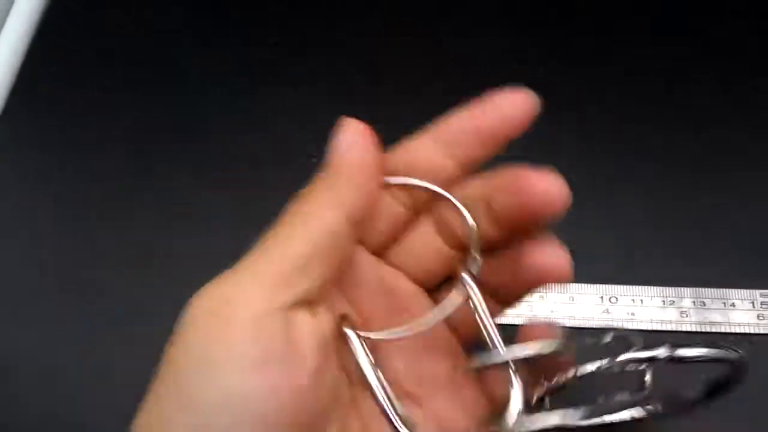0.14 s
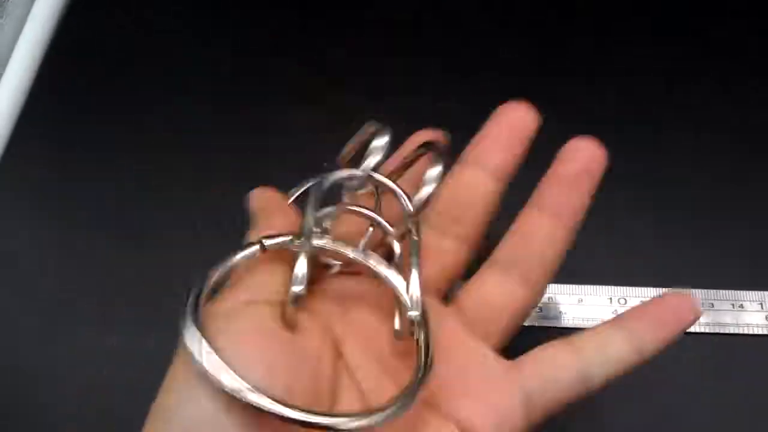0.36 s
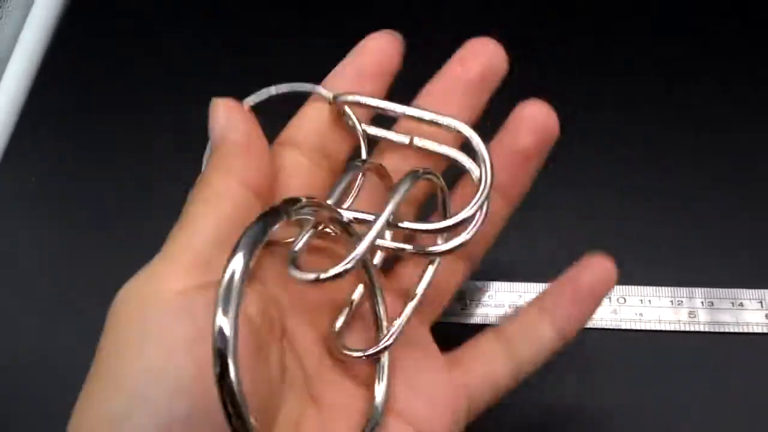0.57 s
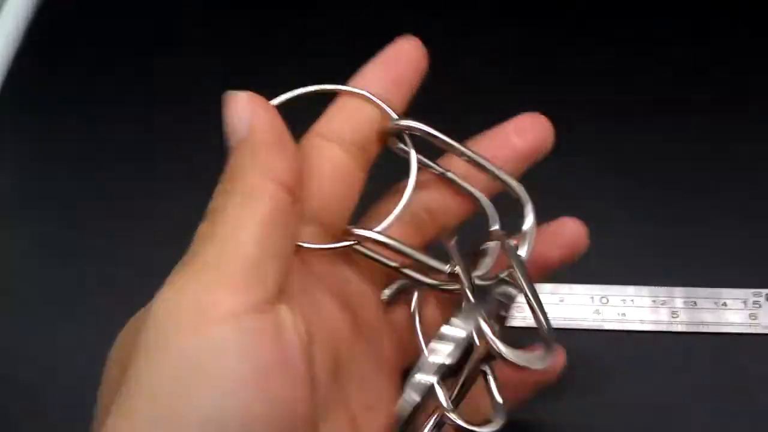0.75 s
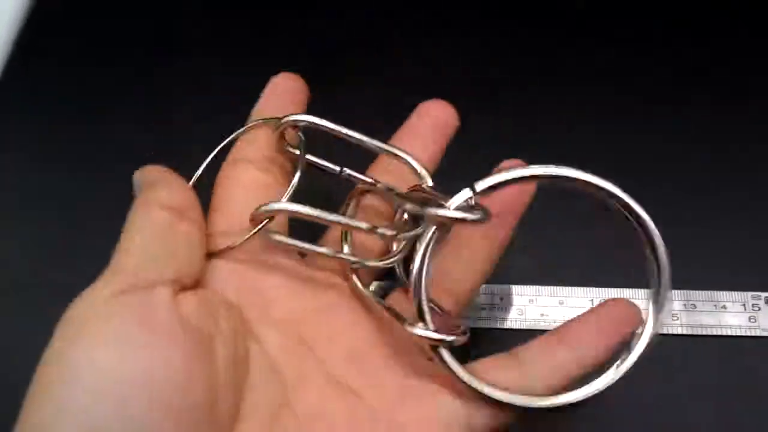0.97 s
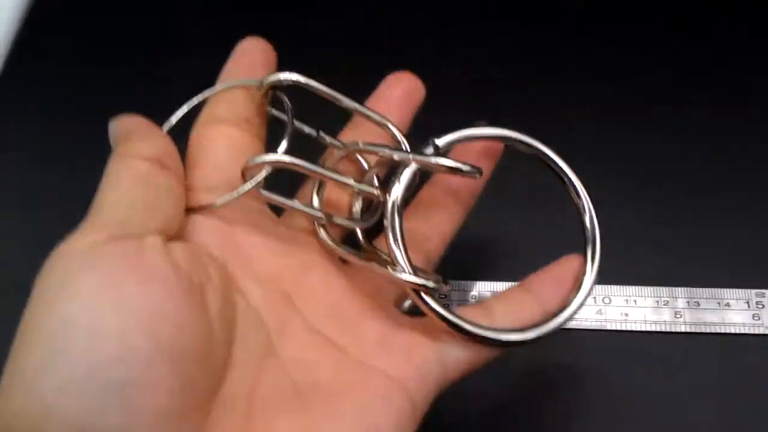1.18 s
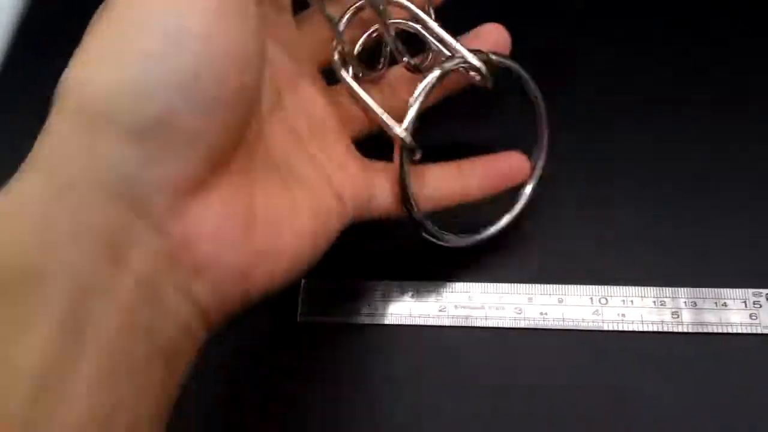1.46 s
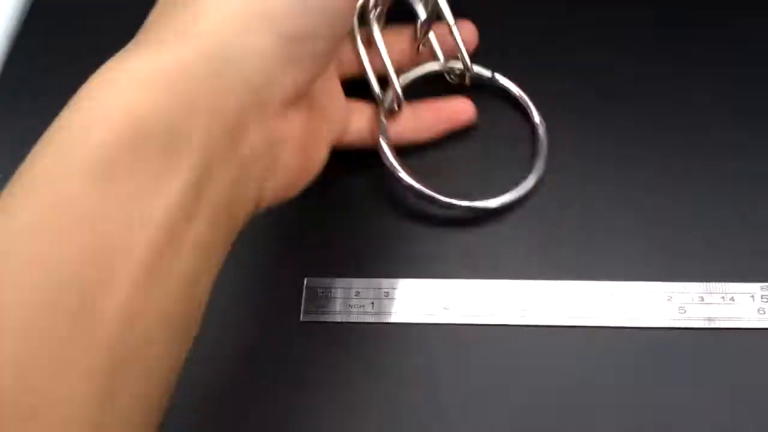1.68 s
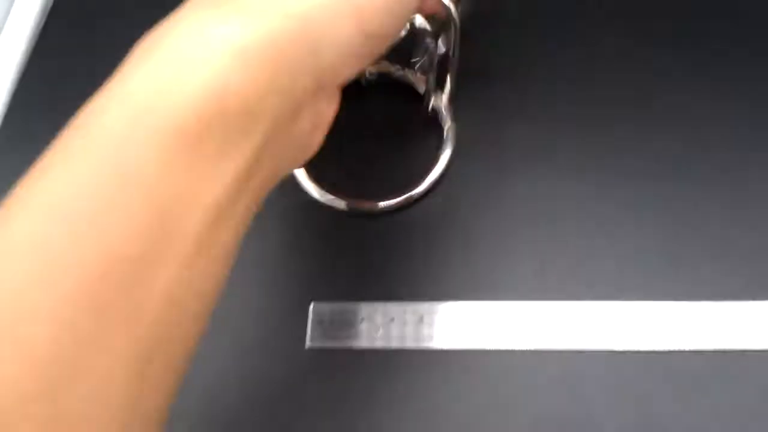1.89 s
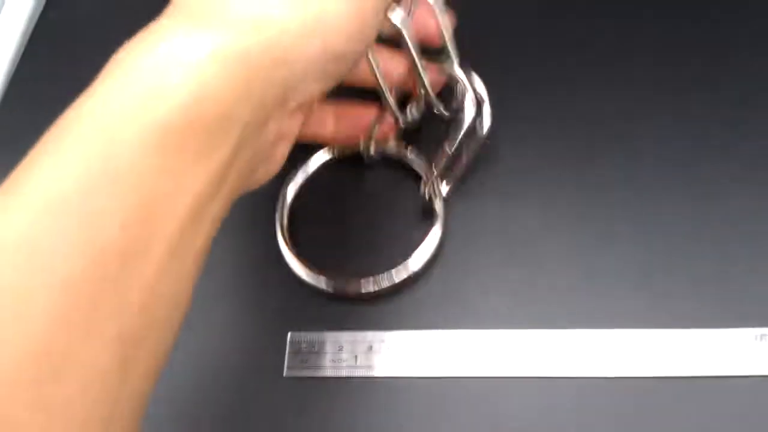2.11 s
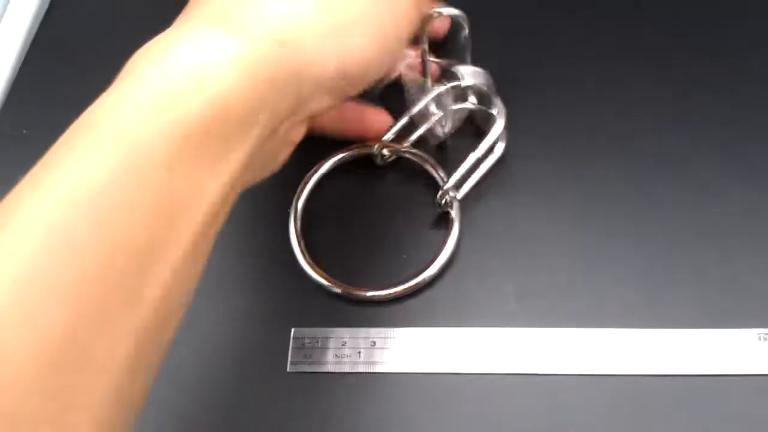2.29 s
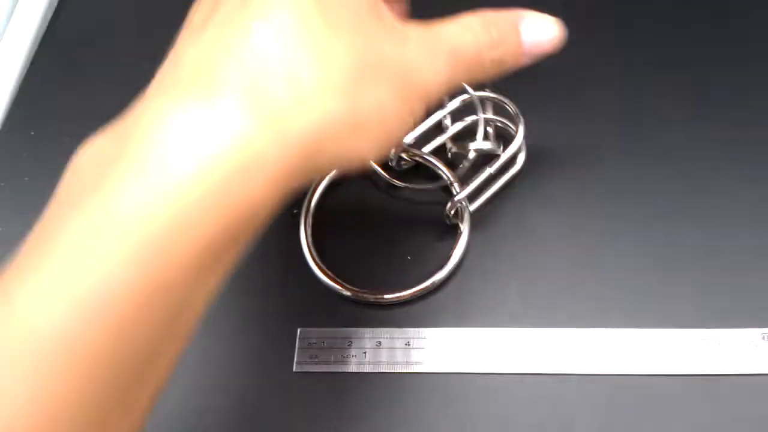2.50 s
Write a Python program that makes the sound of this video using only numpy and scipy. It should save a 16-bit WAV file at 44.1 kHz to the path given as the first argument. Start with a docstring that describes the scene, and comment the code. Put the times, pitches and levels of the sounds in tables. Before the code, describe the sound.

A steel ring puzzle clinks and jingles unevenly in a hand, with light scraping. After a brief lull it is lowered onto a table with two soft knocks and thin rattling. Close microphone, small room, faint fan hum.

```python
"""Jingling steel ring puzzle

A steel ring puzzle is jostled in a hand, then lowered onto a table, close to a stereo microphone.
Each contact chatters briefly and rings the large ring, the small ring and the wire links. The table
answers with a thin rattle and two knocks. A fan hums in the small room; the loudest jingle overloads."""
import sys
import numpy as np
from scipy import signal
from scipy.fft import rfft, irfft
from scipy.io import wavfile

SR = 44100
rng = np.random.default_rng(int(sys.argv[2]) if len(sys.argv) > 2 else 0)


def file_out(sig):
    """Save sig as 16-bit WAV at sys.argv[1]."""
    # one column per channel
    cols = np.atleast_2d(sig).T
    # limit, then scale
    lim = np.clip(cols, -1, 1)
    pcm = np.round(lim * 32767).astype(np.int16)
    wavfile.write(sys.argv[1], SR, pcm)


N = 116865
T = np.arange(N) / SR
TOUCH_S, LAID_S = 1.54, 2.2  # the puzzle first touches the table; the links lie on it
RISE_S, TOP_HZ = .004, 14150
SCATTER_DB, SPREAD_RAD = 1.5, .94  # chance variation in a tone's level and left-right phase
SIDES = np.array([[1], [-1]])  # plus on the left, minus on the right


def amp(db):
    """Turn decibels into a gain."""
    return 10 ** (np.asarray(db) / 20)


def unit(x):
    """Scale to an average power of 1."""
    return x / np.sqrt(np.mean(np.abs(x) ** 2))


def fade(age, t60):
    """Die away by 60 dB every t60 seconds."""
    return np.exp(-np.log(1000) * age / t60)


def envelope(start, hold, rise, fall):
    """Rise quickly, hold, then die away (all in seconds)."""
    age = np.maximum(T - start, 0)
    return (1 - np.exp(-age / rise)) * np.exp(-np.maximum(age - hold, 0) / fall)


def colour(x, curve):
    """Shape bass and treble along a (Hz, dB) curve; white noise keeps its power."""
    hz, db = np.array(curve, float).T
    f = np.maximum(np.fft.rfftfreq(N, 1 / SR), 1)
    gain = amp(np.interp(np.log(f), np.log(hz), db)) * (f < TOP_HZ * 1.1)
    return irfft(rfft(x) * unit(gain), N)


def band(hz, width):
    """Noise gathered around one pitch."""
    f = np.fft.rfftfreq(N, 1 / SR)
    return unit(irfft(rfft(rng.standard_normal(N)) / (1 + (2 * (f - hz) / width) ** 2), N))


def convolve(x, response):
    """Let every sample of a sound set off a ringing or an echo."""
    return signal.fftconvolve(np.atleast_2d(x), response, axes=-1)[:, :N]


def room(x):
    """The direct sound, quick echoes from hand and table, and the room's short tail."""
    age, early_gain = T[:SR // 3], amp(1.5)
    early, late = rng.standard_normal((2, 2, len(age)))
    echoes = early_gain * unit(early * np.exp(-age / .0006)) + amp(-20) * unit(late * fade(age, t60=.2))
    return (x + convolve(x, echoes / np.sqrt(len(age)))) / np.hypot(1, early_gain)


def grip(start):
    """Fingers shorten the ringing and bend its pitch: (share of ring time, pitch scatter)."""
    return (.6, .003) if start < TOUCH_S else (1, .001)


def impacts(size, per_second=900):
    """A dense run of tiny random hits, mixed with some hiss."""
    hits = (rng.random(size) < per_second / SR) * rng.choice([-1, 1], size)
    hits = hits * amp(2 * rng.standard_normal(size))
    return unit(unit(hits) + .5 * rng.standard_normal(size))


# tone colour of the room's noise: f/Hz, relative level/dB
AIR_COLOUR = [(40, -5), (239, -5), (487, -11.5), (856, -10.5), (1090, -20), (1430, -12.5), (1740, -20.5),
              (14000, -42.5)]
# the fan's tones: f/Hz, width/Hz, level/dB
FAN_TONES = [(102, 90, -44), (251.7, 3.3, -47.5), (843.9, 31, -45)]


def fan_and_air(wide_hz=1976):
    """A fan's wavering hum over room noise that is alike on both sides in the bass."""
    middle, side = colour(rng.standard_normal((2, N)), AIR_COLOUR)
    side = irfft(rfft(side) * np.minimum(np.fft.rfftfreq(N, 1 / SR) / wide_hz, 1), N)
    hum = sum(amp(db) * band(hz, width) for hz, width, db in FAN_TONES)
    return amp(-40) * (middle + side * SIDES) + hum


# steel touching steel (also drives the links, scraping and rattle):
# t/s, chatter length/s, large ring level/dB, small ring level/dB, links level/dB
CONTACTS = [(.001, 0.014, -28, -30, -22.5), (0.053, .11, -62, -47, -34), (0.184, 0.029, -32.5, -41, -25.5),
            (.212, .008, -21.5, -29.5, -15), (0.332, 0.037, -30, -30, -16),
            (.366, 0.044, -15.5, -10.5, -13), (0.406, 0.024, -13, -14, -8.5),
            (0.444, 0.011, -10, -5.5, -16), (0.484, 0.015, -31.5, -36, -26),
            (0.586, 0.079, -37.5, -32, -28), (0.685, 0.021, -37, -23, -24.5),
            (0.713, 0.02, -28.5, -32, -24), (0.755, 0.022, -34, -27.5, -25), (0.81, 0.025, -39, -43, -23.5),
            (0.834, 0.027, -18, -24.5, -15), (0.866, 0.023, -49, -40, -18),
            (0.919, 0.025, -37, -28.5, -20.5), (0.982, 0.045, -22.5, -21.5, -20),
            (1.363, 0.0023, -39, -33, -27), (1.446, 0.0031, -28, -31, -25.5), (1.547, 0.02, -31, -28, -16),
            (1.593, 0.03, -22.5, -22, -24.5), (1.648, 0.031, -28.5, -29.5, -16),
            (1.771, 0.034, -29, -43, -22.5), (1.817, 0.017, -13, -19, -12.5),
            (1.87, 0.051, -15.5, -32, -18), (1.921, .025, -20, -25.5, -15.5),
            (1.98, 0.039, -33.5, -53, -21), (2.041, 0.024, -32.5, -32, -18.5),
            (2.147, 0.0083, -31.5, -38, -18), (2.253, 0.036, -23.5, -28, -15.5),
            (2.308, 0.025, -31.5, -38, -16), (2.342, 0.037, -39, -34, -16), (2.392, 0.037, -50, -41, -23.5),
            (2.536, 0.01, -51, -47, -41.5)]
# the tones each ring makes as it bends: f/Hz
LARGE_RING_HZ = [2392, 4414, 7031, 10164, 13812]
SMALL_RING_HZ = [3553, 6043, 8991, 12293]
# what each tone adds to the contact's level: in hand level/dB, on table level/dB
LARGE_RING_LEVELS = [(-23, -18.5), (-14, -10.5), (-12, -4.5), (1.5, -0.5), (3.5, -4)]
SMALL_RING_LEVELS = [(-23, -18), (-14, -11), (0.5, -1), (0, 0.5)]


def ring(pitches, levels, column, flutter_hz=97):
    """Each contact starts all of a ring's tones, and chatter makes them flutter."""
    out, size = np.zeros((2, N + SR)), SR // 3
    age = T[:size]
    for contact in CONTACTS:
        start, hold = contact[:2]
        first = int(start * SR)
        time_share, detune = grip(start)
        for hz, (hand_db, table_db) in zip(pitches, levels):
            phase, lag, scatter, pull = rng.standard_normal(4)
            steps = rng.standard_normal((4, 256))
            flutter = .55 * np.array([np.interp(age * flutter_hz, np.arange(256), s) for s in steps])
            t60 = time_share * .14 * (1e4 / hz) ** .63  # higher tones die sooner
            shape = (1 - np.exp(-age / RISE_S)) * fade(np.maximum(age - hold, 0), t60)
            angle = 2 * np.pi * (hz * (1 + detune * pull) * age + phase) + SPREAD_RAD * lag * SIDES
            tone = (1 + flutter[:2]) * np.sin(angle) + flutter[2:] * np.cos(angle)
            db = contact[column] + (table_db if start > TOUCH_S else hand_db) + SCATTER_DB * scatter
            out[:, first:first + size] += amp(db) * shape * tone
    return out[:, :N]


# the tones of the wire links: f/Hz
LINK_PITCHES = [3300, 4170, 5430, 5864, 7376, 8600, 9530, 9680, 10349, 11655, 11850, 12030, 12380, 13880]
# the balance between those tones: held level/dB, laid down level/dB
LINK_LEVELS = [(-20.5, -3), (-10.5, -4.5), (-7, 2), (-3, 1), (0.5, 0.5), (-3.5, -4.5), (0.5, 8), (3, -12),
               (-2, 14), (2.5, 1), (4, 1.5), (6, 12), (7.5, -5), (7, 7)]


def links(chatter_fall_s=.008):
    """Each contact chatters on the wire links; their blend of tones changes once they lie down."""
    out, age = np.zeros((2, N + SR)), T[:SR // 6]
    for start, hold, _, _, db in CONTACTS:
        time_share, detune = grip(start)
        tones = 0
        for hz, (held_db, laid_db) in zip(LINK_PITCHES, LINK_LEVELS):
            scatter, pull, phase, lag = rng.standard_normal(4)
            angle = 2 * np.pi * (hz * (1 + detune * pull) * age + phase) + SPREAD_RAD * lag * SIDES
            tone_db = (laid_db if start > LAID_S else held_db) + SCATTER_DB * scatter
            tones = tones + amp(tone_db) * np.sin(angle)
        shape = (1 - np.exp(-10 * age / RISE_S)) * fade(age, t60=.1 * time_share)
        ringing = unit(tones * shape) / np.sqrt(len(age))
        force = impacts(len(age)) * np.exp(-np.maximum(age - hold, 0) / chatter_fall_s)
        clink, first = convolve(force, ringing), int(start * SR)
        out[:, first:first + clink.shape[1]] += amp(db) * clink
    return out[:, :N]


def chatter(contacts, fall_s):
    """Tiny hits, as strong as the contacts that set them off."""
    power = sum((amp(db) * envelope(t, hold, RISE_S / 2, fall_s)) ** 2 for t, hold, _, _, db in contacts)
    return impacts(N) * np.sqrt(power)


def loop_ringing(low_hz, high_hz, count=48):
    """A wire loop rings briefly with many weak, unevenly spaced tones."""
    age = T[:SR // 8]
    hz = low_hz + (high_hz - low_hz) * (np.arange(count) + rng.random(count)) / count
    phase = 2 * np.pi * rng.random((2, count, 1))
    tones = np.sin(2 * np.pi * hz[:, None] * age + phase).sum(axis=1)
    return unit(tones * fade(age, t60=.05)) / np.sqrt(len(age))


# tone colour of steel scraping steel: f/Hz, relative level/dB
SCRAPE_COLOUR = [(2500, -14), (7000, 0.5), (14000, -0.5)]


def scraping(loops=6):
    """The wire loops take turns scraping while the puzzle is in the hand."""
    in_hand = [contact for contact in CONTACTS if contact[0] < TOUCH_S]
    scrapes = 0
    for k in range(loops):
        force = chatter(in_hand[k::loops], fall_s=.012)
        scrapes = scrapes + convolve(force, loop_ringing(LARGE_RING_HZ[0] / 2, TOP_HZ))
    return amp(-5) * colour(scrapes, SCRAPE_COLOUR)


# hard landings of the puzzle: t/s, level/dB, f/Hz
HARD_TAPS = [(0.215, -14, 6000), (0.3393, -19, 5300), (0.3386, -21, 1480), (1.341, -30, 4900),
             (1.745, -27, 5700), (2.261, -24, 8700)]


def taps():
    """The puzzle lands on fingers or table, each time with a short burst of noise."""
    return sum(amp(db) * envelope(t, hold=.002, rise=.0002, fall=.004) * band(hz, width=.45 * hz)
               for t, db, hz in HARD_TAPS)


# tone colour of steel rattling on the table: f/Hz, relative level/dB
RATTLE_COLOUR = [(900, -5), (1500, 3), (3400, -2), (9000, 0)]


def table_rattle():
    """Once the steel touches the table, each contact rattles thinly against it."""
    on_table = [contact for contact in CONTACTS if contact[0] >= TOUCH_S]
    return amp(-9.5) * colour(chatter(on_table, fall_s=.024), RATTLE_COLOUR)


# pushes on the table: t/s, level/dB, length/s (longer sounds duller)
TABLE_PUSHES = [(1.5505, -15, 0.0025), (1.8987, -13.5, 0.00073)]
# the table top's own tones: f/Hz, level/dB, time to fade by 60 dB/s
TABLE_TONES = [(158.7, -13, 0.24), (263, -3, 0.13), (336, 10.5, 0.015), (530, -1, 0.073)]


def table_knocks():
    """The puzzle's weight pushes on the table top, which booms briefly."""
    push = 0
    for start, db, length in TABLE_PUSHES:
        half = length / 2
        push = push + amp(db) * np.exp(-2 * ((T - start - half) / half) ** 2) / (half * SR)
    boom = sum(amp(db) * np.sin(2 * np.pi * hz * T) * fade(T, t60) for hz, db, t60 in TABLE_TONES)
    return convolve(-push, boom[None])


def scene():
    """The puzzle, slightly to the left, over the table's knocks and the fan."""
    large = ring(LARGE_RING_HZ, LARGE_RING_LEVELS, column=2)
    small = ring(SMALL_RING_HZ, SMALL_RING_LEVELS, column=3)
    steel = large + small + room(links()) + scraping() + room(table_rattle() + taps())
    lean = amp(SIDES * 1.9 / 2)  # left is 1.9 dB louder than right
    return steel * lean + table_knocks() + fan_and_air()


def record(dry):
    """The microphone drops the deep bass, the loudest peaks clip and the highest treble is cut."""
    bass_cut = signal.butter(4, 108, "highpass", fs=SR, output="sos")
    treble_cut = signal.ellip(10, .2, 70, TOP_HZ, fs=SR, output="sos")
    clipped = np.clip(signal.sosfilt(bass_cut, dry), -.9, .9)
    return signal.sosfilt(treble_cut, clipped)


dry = scene()
out = record(dry)
file_out(out)
```